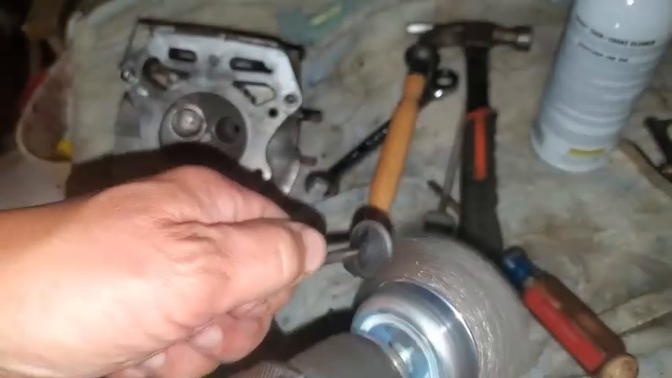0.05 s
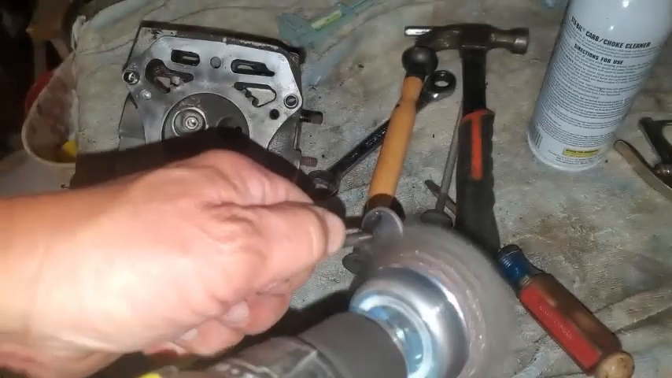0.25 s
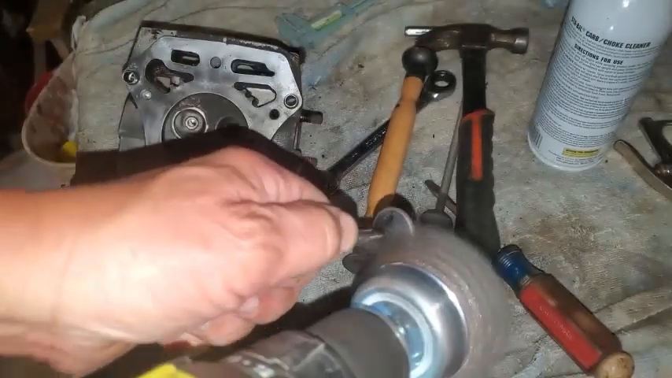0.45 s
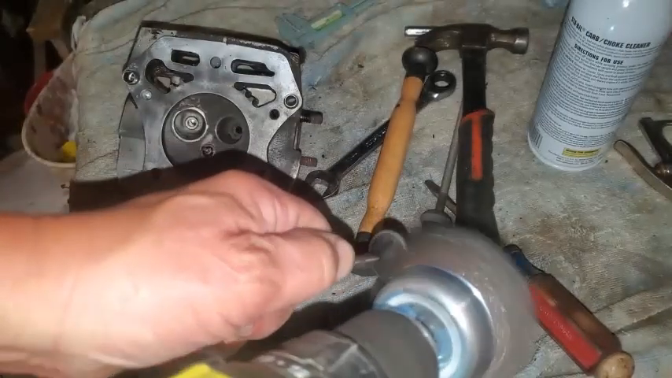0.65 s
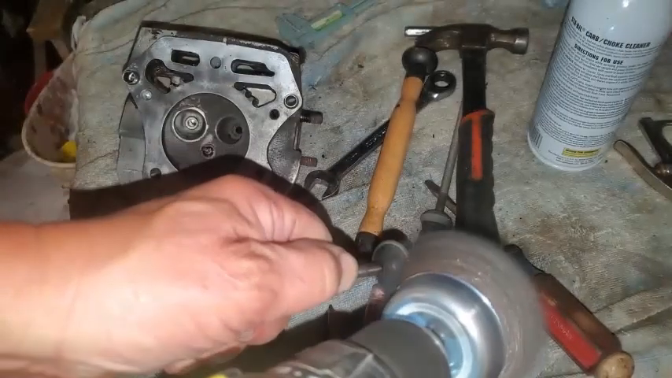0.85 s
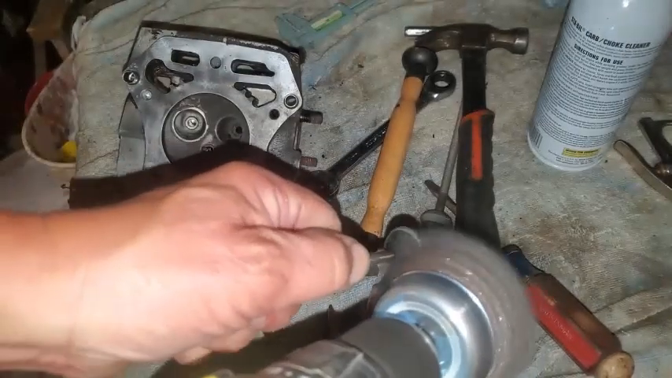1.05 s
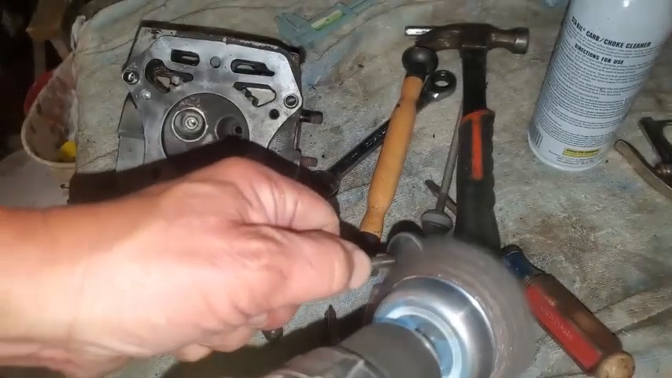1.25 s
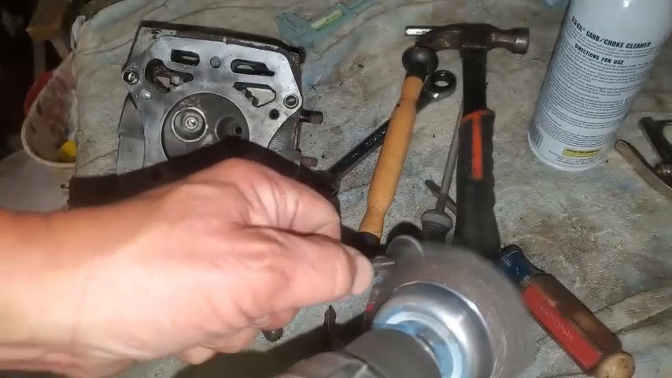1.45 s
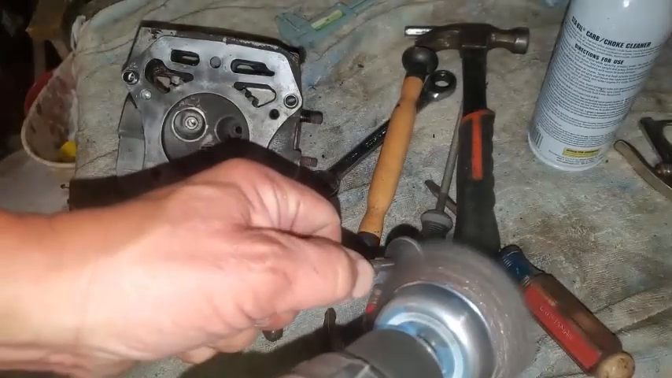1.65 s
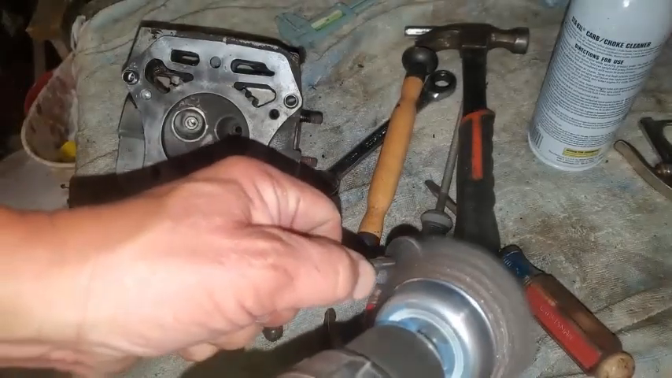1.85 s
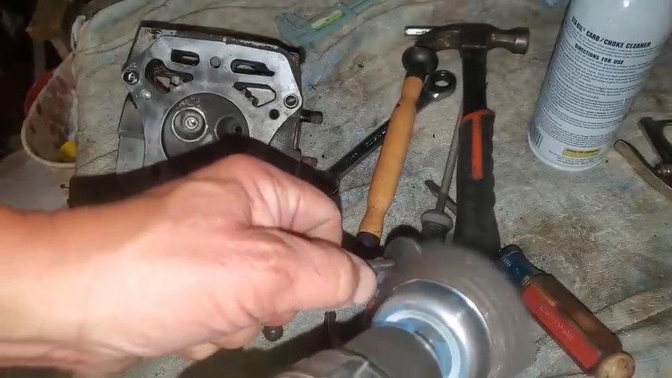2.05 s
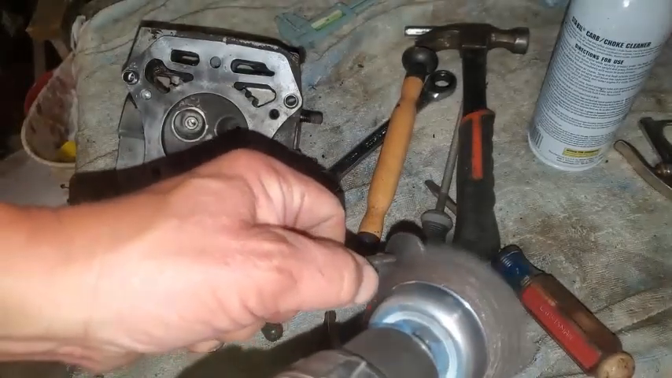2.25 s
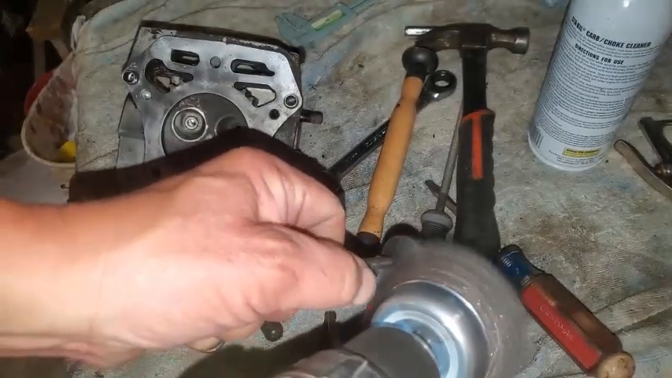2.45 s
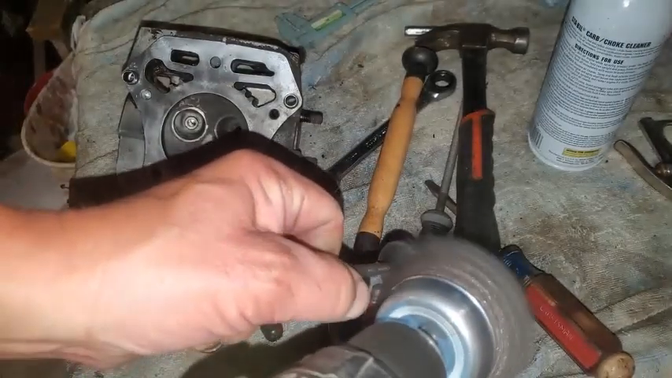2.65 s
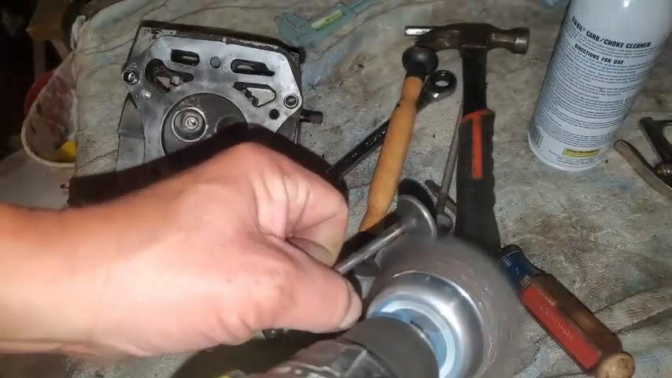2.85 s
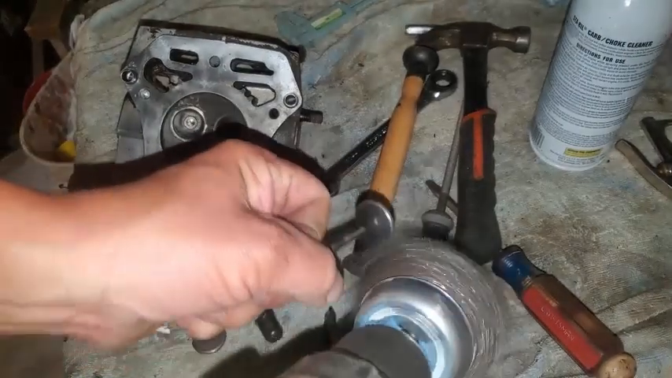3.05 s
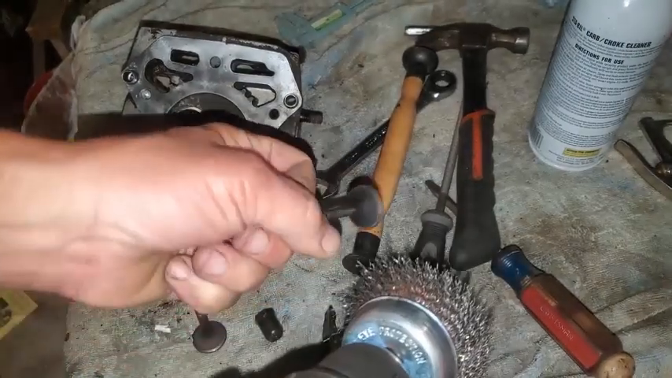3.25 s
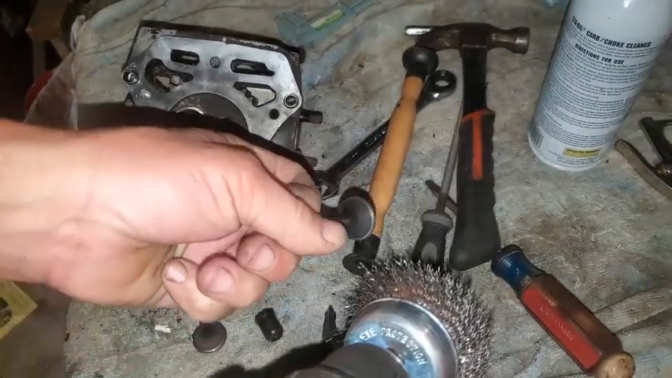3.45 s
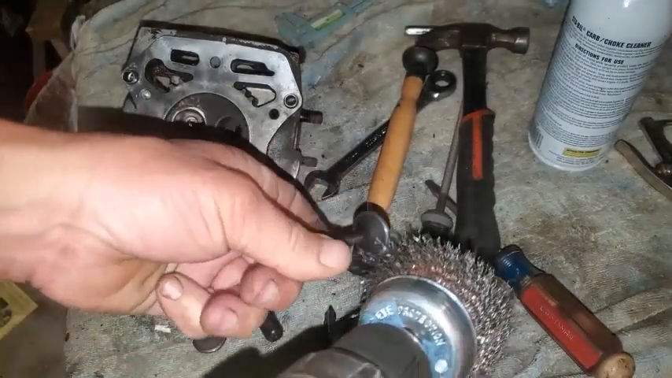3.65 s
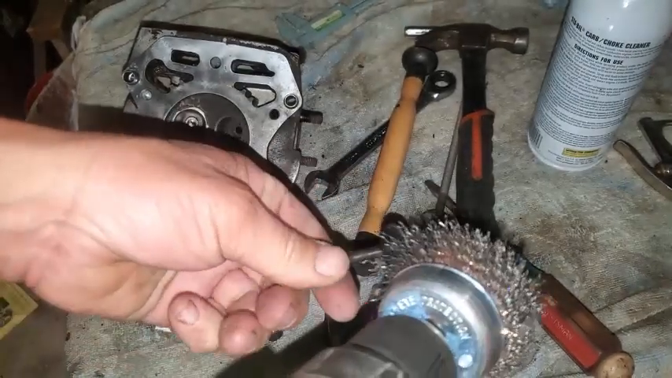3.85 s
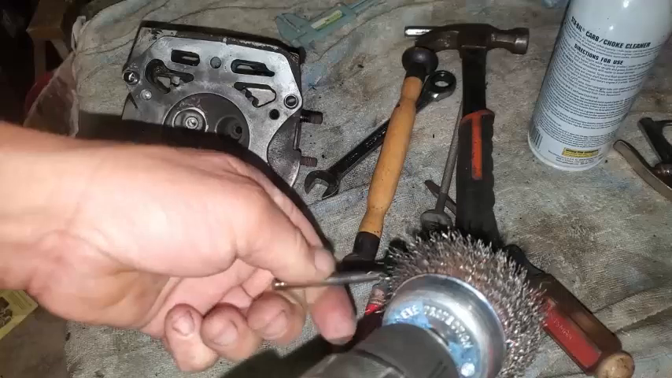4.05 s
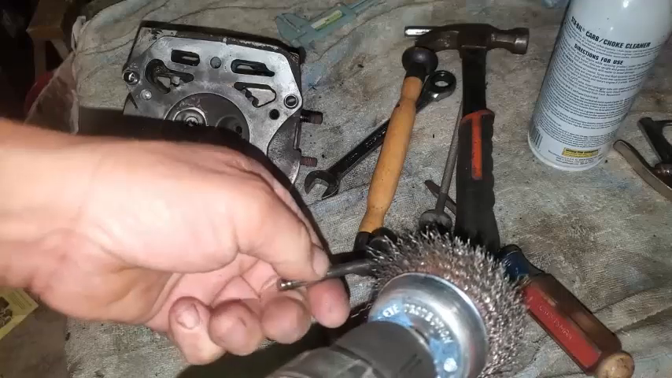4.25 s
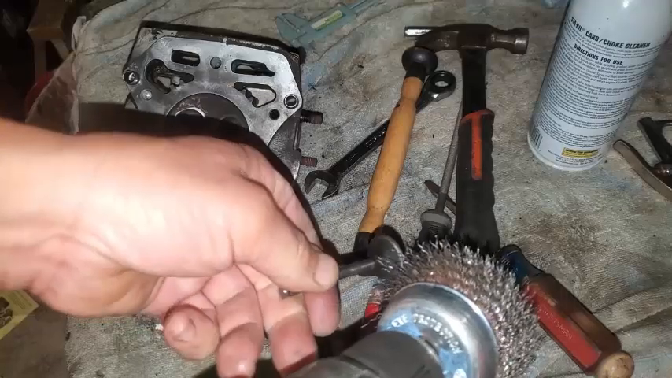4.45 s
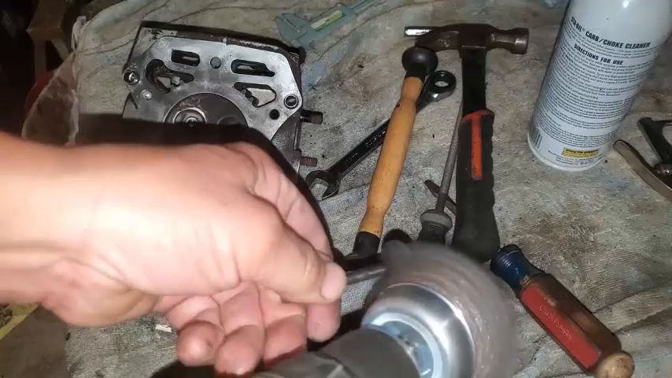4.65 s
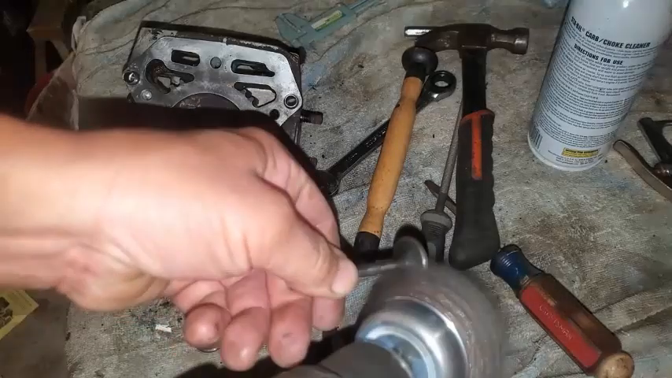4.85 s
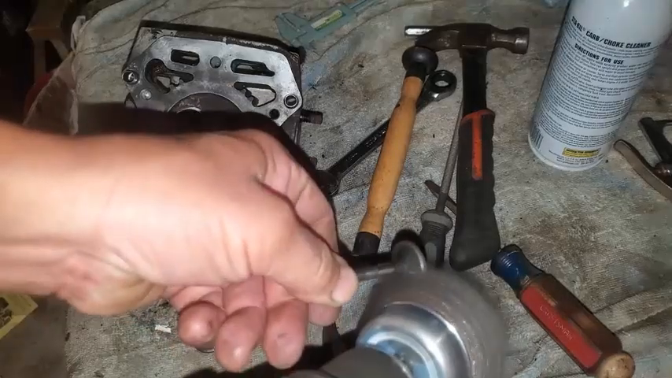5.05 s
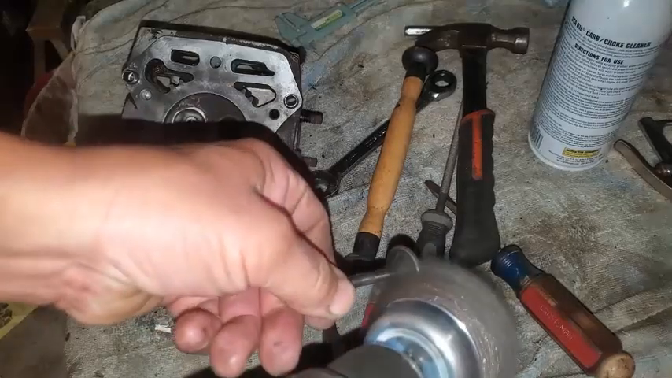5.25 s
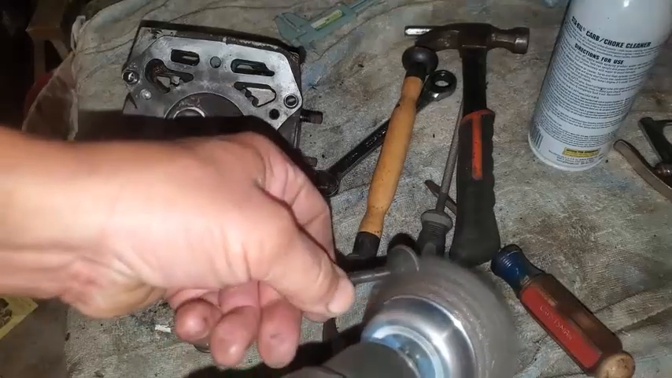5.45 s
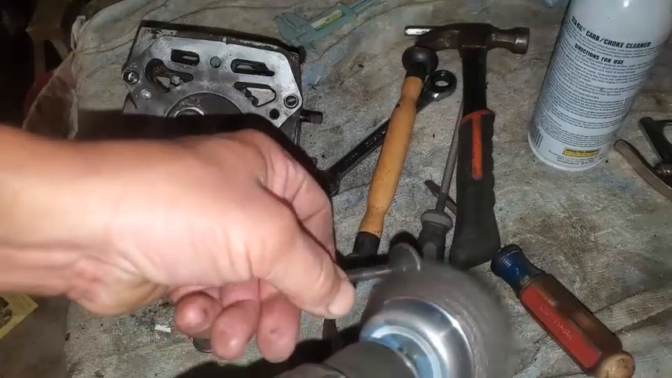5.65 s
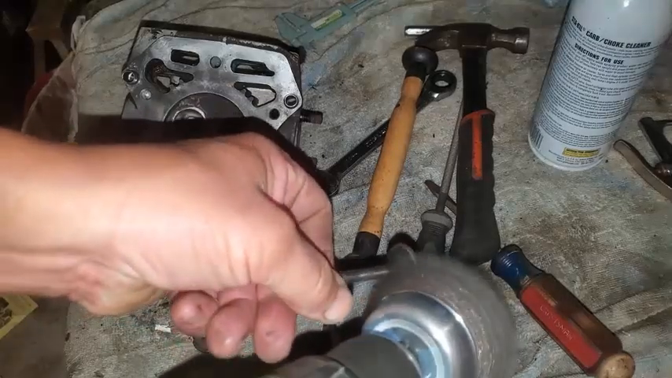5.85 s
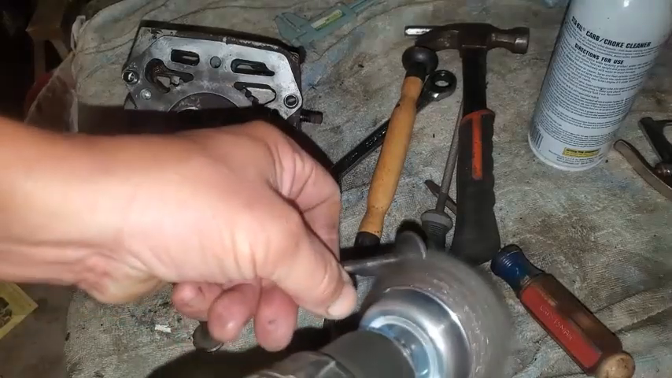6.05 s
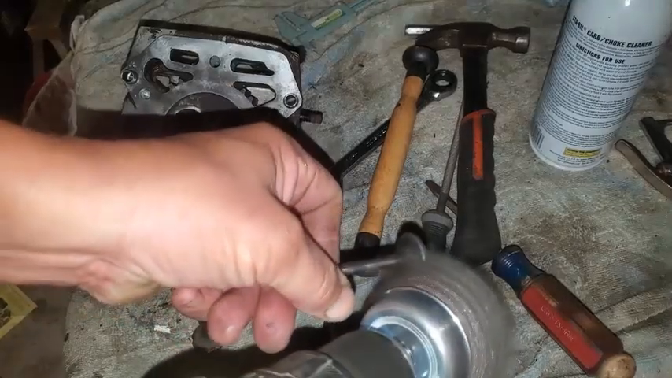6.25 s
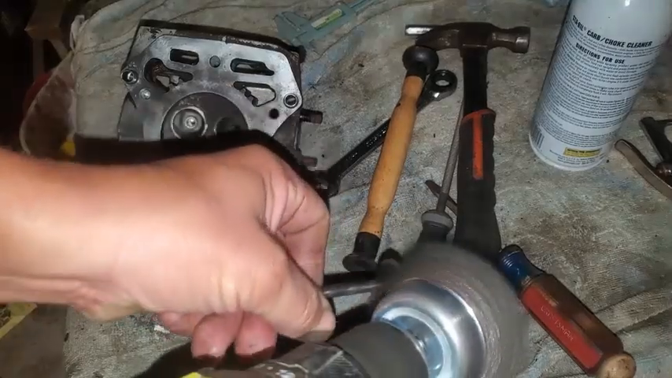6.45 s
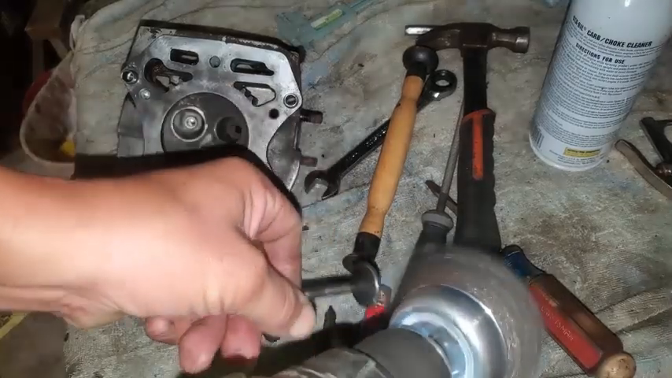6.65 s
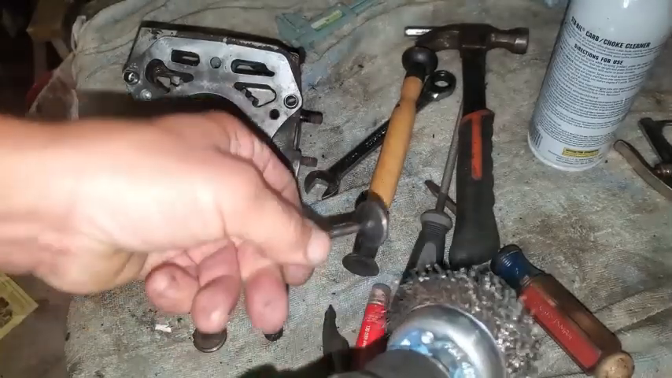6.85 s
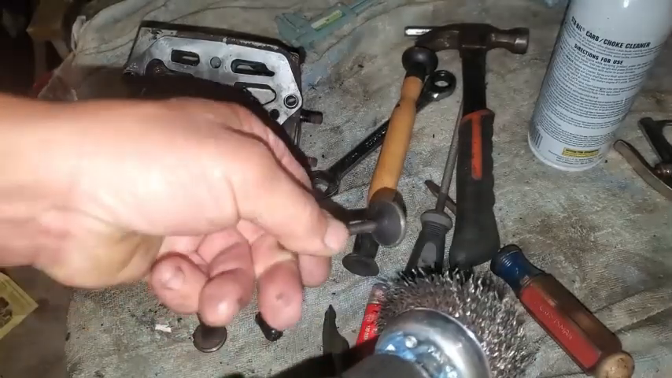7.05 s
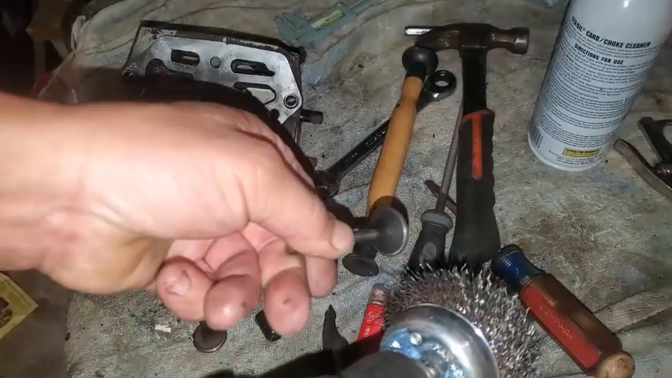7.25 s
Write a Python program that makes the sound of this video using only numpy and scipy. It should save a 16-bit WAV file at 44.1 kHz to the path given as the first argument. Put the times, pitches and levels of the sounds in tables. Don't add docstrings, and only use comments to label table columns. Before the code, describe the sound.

Very close in a small workshop, a cordless drill spins up at once and holds a steady, gritty whine with gear rattle and wire bristles scratching steel. After three seconds it brakes sharply with a cluster of clacks. A distant machine hums through a short pause with faint hand rustling, then the trigger clicks and a second, shorter run follows, braking just as abruptly into near quiet.

```python
import sys
import numpy as np
from scipy import signal
from scipy.fft import rfft, irfft
from scipy.io import wavfile
from scipy.ndimage import uniform_filter1d

SR = 44100
rng = np.random.default_rng(int(sys.argv[2]) if len(sys.argv) > 2 else 0)


def gain_from_db(level_db):
    decades = np.asarray(level_db, float) / 20
    return 10 ** decades


def generate_wav(signal):
    frames = np.transpose(np.atleast_2d(signal))
    scaled = np.clip(frames, -1, 1) * 32767
    pcm = np.round(scaled).astype(np.int16)
    wavfile.write(sys.argv[1], SR, pcm)


N = 322371
T = np.arange(N) / SR
GEAR_RATIO = 14.36


def unit(x):
    return x / np.sqrt(np.mean(x ** 2))


def curves(table):
    s, *columns = np.transpose(table)
    return [np.interp(T, s, c) for c in columns]


def ramp(start_s, length_s):
    return np.clip((T - start_s) / length_s, 0, 1)


def walk(rate):
    levels = uniform_filter1d(np.repeat(rng.standard_normal(int(N / SR * rate) + 2), 4), 4)
    return 1.3 * np.interp(T * rate * 4, np.arange(len(levels)), levels)


def colour(x, points, size=4096):
    hz, db = np.transpose(points)
    log_hz = np.log(np.fft.rfftfreq(size, 1 / SR) + 1)
    cep = irfft(np.log(gain_from_db(np.interp(log_hz, np.log(hz), db))))
    cep[1:size // 2] *= 2
    cep[size // 2 + 1:] = 0
    return signal.fftconvolve(x, irfft(np.exp(rfft(cep))))[:len(x)]


def band(x, hz, width_hz):
    edges = np.clip([hz - width_hz / 2, hz + width_hz / 2], 50, 20000)
    return signal.sosfilt(signal.butter(2, edges, "bandpass", fs=SR, output="sos"), x)


def grains(share, spread_db):
    hit = rng.random(N) < share
    sign = rng.standard_normal(N)
    size = rng.exponential(size=N)
    return unit(hit * sign * gain_from_db(spread_db * size))


def shop():
    # pitch_hz [Hz], level_db [dB per Hz]
    rumble_spectrum = [(15, -47.5), (25, -18.5), (75, -5.5), (145, -5.5), (207, -20), (319, -21.5),
                       (381, -24.5), (635, -39), (1950, -49.5), (4870, -42), (6900, -44.5), (7400, -68),
                       (22000, -120)]
    # time_s [s], level_db [dB]
    swell = [
        (3.25, -62.5),
        (3.8, -67),
        (4.15, -67.5),
        (4.3, -64.5),
        (4.56, -60),
        (6.95, -68.5),
    ]
    # multiple [of its beat], level_db [dB], drift_db [dB per s]
    hum_tones = [(2, -72, 0), (3, -72, -3), (3.72, -66, 0), (5, -70, 4), (6, -67, 2), (7, -76, 0),
                 (8, -66, -6), (9, -82, 0), (10, -80, 0), (11, -82, -3), (15, -77, -2)]
    beat_hz = 24.8
    swell_db = curves(swell)[0]
    mid, side = (unit(colour(rng.standard_normal(N), rumble_spectrum)) for _ in range(2))
    hum = 0
    for k, db, drift_db in hum_tones:
        level_db = db + 70.5 + drift_db * np.clip(T - 3.9, -1, .7) + 2 * walk(6)
        hum = hum + gain_from_db(level_db) * np.sin(2 * np.pi * k * beat_hz * T + .4 * walk(4))
    return gain_from_db(swell_db - 3.0) * (mid + 0.57 * hum + 0.42 * side * np.array([[1], [-1]]))


def rustle():
    # start_s [s], level_db [dB], centre_hz [Hz], width_hz [Hz],
    # decay_s [s]
    puffs = [(3.3, -86, 4500, 1500, .34), (3.67, -67, 6400, 1200, .04), (3.68, -87, 2600, 900, .05),
             (3.905, -77, 3000, 5000, .04), (4.14, -80, 5300, 1500, .04), (4.47, -78, 3500, 5500, .1),
             (4.537, -52, 1100, 1200, .003), (4.51, -75, 2500, 4000, .06), (3.36, -88, 900, 80, .2),
             (3.28, -87, 1800, 300, .09), (7.0, -89, 5000, 3000, .27), (7.265, -70, 6400, 1200, .08),
             (7.27, -84, 3000, 1200, .05)]
    out, t = np.zeros(N + SR), T[:SR]
    for s, db, hz, width_hz, decay in puffs:
        puff = np.minimum(t * 500, 1) * np.exp(-t / decay) * unit(band(rng.standard_normal(SR), hz, width_hz))
        out[int(s * SR):int(s * SR) + SR] += gain_from_db(db) * puff
    return out[:N] * gain_from_db(2.5 * walk(67))


def motor():
    # [dB, brush at low speed]
    runs = [
        (-.015, 2.985, 3.02, 3.108, 6),
        (4.593, 6.675, 6.729, 6.815, 4),
    ]
    full_hz, spin_up_s, start_lag_s = 379.2, .09, .005
    coast_hz_per_s, brake_hz_per_s = 1050, 2100
    which = np.where(T < (runs[0][3] + runs[1][0]) / 2, 0, 1)
    on, free, brake, stop, bite_db = np.array(runs).T[:, which]
    up = np.tanh(np.maximum(T - on - start_lag_s, 0) / spin_up_s)
    lost_hz = coast_hz_per_s * np.clip(T - free, 0, brake - free) + brake_hz_per_s * np.maximum(T - brake, 0)
    rotor_hz = np.maximum(full_hz * up * (1 + .004 * walk(2.5)) - lost_hz, 0)
    slow = 1 - rotor_hz / full_hz
    level_db = -25.5 - 11.5 * slow + bite_db * (1 - up)
    level_db = level_db + 2.5 * np.exp(-np.abs(T - on) / 0.36)
    level_db = level_db - 2 * ramp(free, brake - free)
    level_db = level_db + (-6.5 + bite_db) * ramp(brake - .011, .004) + .5 * walk(5)
    spinning = ramp(on, 0.0027) * (1 - ramp(stop - .0048, 0.0075))
    wire_db = -13.5 - 6.5 * slow + 1.0 * walk(9.9)
    return rotor_hz, spinning, level_db, wire_db


def draught(turns):
    # pitch_hz [Hz], level_db [dB per Hz]
    buffet_spectrum = [(20, -12), (50, -4), (100, 2.5), (170, -4), (300, -14.5), (800, -38)]
    # time_s [s], length_s [s], level_db [dB]
    jolts = [
        (.06, 0.053, 11.5),
        (0.212, 0.067, 13.5),
        (1.552, 0.14, 4),
        (2.898, .1, 5),
        (4.76, .09, 5.5),
        (6.617, 0.083, 9),
    ]
    chuck = 2 * np.pi * turns / GEAR_RATIO
    beat_db = 5 * np.sin(2 * chuck) + 2.1 * np.sin(chuck) + 3 * walk(4.01)
    beat_db = beat_db + sum(db * np.exp(-((T - s) / length) ** 2) for s, length, db in jolts)
    shared = .7 * gain_from_db(3.6 * walk(7)) * unit(colour(rng.standard_normal(N), buffet_spectrum))
    both = []
    for _ in range(2):
        own = gain_from_db(4.0 * walk(6.5)) * unit(colour(rng.standard_normal(N), buffet_spectrum))
        both.append(gain_from_db(-32.0 + beat_db) * (shared + own))
    return np.array(both)


def clacks():
    # start_s [s], peak_db [dB], ring_hz [Hz], length_ms [ms]
    knock_list = [(3.0283, -12, 4300, 1.4), (3.0318, -13, 5000, 1.5), (3.0328, -9.5, 2000, 2.2),
                  (3.072, -16.5, 1700, 3), (3.0995, -16, 5000, 2.2), (3.1036, -14, 4000, 1.5),
                  (3.1206, -25, 4350, 3), (4.5955, -9.5, 2300, .9), (4.6272, -14.5, 2450, 1.8),
                  (4.636, -16, 2500, 5), (4.669, -13, 4000, 1.8), (4.675, -14, 4000, 1.8),
                  (6.7160, -12, 3000, 1.4), (6.7298, -9.5, 3700, 1.6), (6.7304, -14, 6200, 1.4),
                  (6.785, -17.5, 1500, 5), (6.7945, -23, 1500, 2), (6.8104, -23, 2200, 3)]
    out, t = np.zeros(N), T[:2000]
    noise = rng.standard_normal((len(knock_list), len(t)))
    for (s, db, hz, ms), grit in zip(knock_list, noise):
        crack = unit(band(grit, 300 + 1.2 * hz, 2.4 * hz))
        knock = (crack + .5 * np.sin(2 * np.pi * hz * t)) * np.exp(-1000 * t / ms)
        i = int(s * SR)
        out[i:i + len(t)] += gain_from_db(db + 1.0) * knock / np.abs(knock).max()
    return out


def rattle(turns):
    # pitch_hz [Hz], level_db [dB per Hz]
    rattle_spectrum = [(25, -38), (90, -23.5), (250, -21.5), (420, -12), (1000, -8), (1750, -1.5),
                       (2050, -2.5), (3000, -5.5), (4500, -3), (5200, -5.5), (6700, -5.5), (7150, -10.5),
                       (7350, -19.5), (9000, -40)]
    chuck = 2 * np.pi * turns / GEAR_RATIO
    throb_db = 0.19 * np.sin(chuck) + 0.15 * np.sin(2 * chuck + 0.36) + 1.17 * walk(90) + 0.18 * walk(8)
    return gain_from_db(throb_db) * unit(colour(grains(.4, 1.5), rattle_spectrum))


def casing_db(hz):
    # pitch_hz [Hz], width_hz [Hz], lift_db [dB]
    shell_modes = [(950, 350, 9), (1300, 400, -6), (2400, 550, 6), (3350, 400, -7), (4700, 1800, -2)]
    return sum(db / (1 + (2 * (hz - f) / w) ** 2) for f, w, db in shell_modes)


def whine(rotor_hz, turns):
    rotor_tones = [(1, -23.5, 2.5, -3, -3, 1), (1.14, -27, 2.5, -6, -6, 1), (1.21, -28, 2.5, -6, -6, 1),
                   (2, -27, 2.5, -3, -3, 1), (3.75, -34, 2, 11, 11, 680), (8, -8.5, 2.5, -8, -9, 1900),
                   (9, -24, 4, -3, -12, 1), (16, -26, 2.5, 11, 3, 2200), (20, -25, 3, 0, -10, 1),
                   (24, -26, 3, 0, -10, 1)]
    torque = uniform_filter1d(np.gradient(rotor_hz) * SR, size=800) / 1500
    push = np.clip(torque, 0, 1)
    brake = np.clip(-torque - .5, 0, 1)
    coast = np.clip(-torque, 0, 1) - brake
    judder_db = 2 * (push + brake) * walk(70)
    fan_db = -9 + 2 * push + judder_db + 2 * walk(14) + 1.5 * np.sin(2 * np.pi * turns / GEAR_RATIO)
    fan = np.sin(2 * np.pi * 19 * turns + .5 * walk(40))
    out = gain_from_db(fan_db) * (rotor_hz / 380) ** 3 * fan
    for k, db, shake_db, push_db, brake_db, above_hz in rotor_tones:
        tone = np.sin(2 * np.pi * k * turns + .35 * walk(40))
        tone = tone * np.clip(k * rotor_hz / above_hz, 0, 1) ** 8
        tone_db = db + push_db * push + brake_db * brake + casing_db(k * rotor_hz)
        out = out + gain_from_db(tone_db - 7.8 * coast + judder_db + shake_db * walk(35)) * tone
    return out * np.clip(rotor_hz / (130 + 110 * brake), 0, 1) ** 4


def flares(turns):
    sweeps = [(.029, .009, 16, 1), (.048, .005, 16, -3), (.055, .005, 19, -1), (.065, .007, 15.5, -3),
              (.075, .015, 7.7, -2), (.08, .01, 19, -5), (.11, .006, 19, -2), (.128, .013, 8, -6),
              (3.052, .014, 8, -2), (3.058, .009, 3.75, -3), (3.087, .005, 3.6, -7), (4.638, .004, 16, -2),
              (4.668, .015, 3.75, -4), (4.685, .006, 5.2, -3), (4.702, .016, 8, -2), (4.71, .01, 19, -3),
              (4.765, .013, 19, -5), (4.775, .028, 8, -7), (6.748, .012, 8, -6), (6.767, .014, 3.75, -4)]
    shake = walk(150)
    out = 0
    for s, half, k, db in sweeps:
        tone = np.sin(2 * np.pi * k * turns + .5 * shake[::-1])
        out = out + gain_from_db(db) * np.exp(-((T - s) / half) ** 4) * tone
    return gain_from_db(2.5 * shake) * out


def wires(turns):
    # pitch_hz [Hz], level_db [dB per Hz]
    wire_spectrum = [(3000, -28.5), (7300, 7.5), (8150, 10.5), (8400, 13), (10600, 14.5), (12500, -28.5)]
    wobble_db = 0.4 * np.sin(2 * np.pi * turns / GEAR_RATIO + 1.0) + 0.23 * walk(45) + 0.18 * walk(9.9)
    return gain_from_db(wobble_db) * unit(colour(grains(.3, 0.7), wire_spectrum))


def room(x, count=6):
    t60_s = 0.28
    t = T[:SR // 2]
    noise = rng.standard_normal((count, 2, len(t)))
    dull = signal.lfilter([.3], [1, -.7], noise)
    deep = signal.lfilter([.15], [1, -.85], noise)
    tail = (noise - dull) * gain_from_db(-60 * t / (0.75 * t60_s))
    tail = tail + (dull - deep) * gain_from_db(-60 * t / (1.0 * t60_s))
    tail = tail + deep * gain_from_db(-60 * t / (0.7 * t60_s))
    tail = tail * np.minimum(t / 0.0016, 1)
    aim = np.array([walk(1.5) for _ in range(count)])
    aim = aim / np.sqrt(np.sum(aim ** 2, axis=0))
    tail = tail / np.sqrt(np.mean(np.sum(tail ** 2, axis=2)))
    return gain_from_db(-3.5) * sum(signal.fftconvolve((x * a)[None], h, axes=1)[:, :N] for a, h in zip(aim, tail))


def ports(x, count, left_db):
    return np.array([x * gain_from_db(left_db / 2), np.roll(x, count) * gain_from_db(-left_db / 2)])


def body_colour(near):
    shading = [(0, 1780, 220, .35), (0, 2110, 300, -.5), (1, 1650, 600, -.2), (0, 4400, 700, .12)]
    out = near
    for port, hz, width_hz, share in shading:
        out = out + share * band(near[port], hz, width_hz) * (np.arange(2) == port)[:, None]
    return out


def scene():
    rotor_hz, spinning, level_db, wire_db = motor()
    turns = np.cumsum(rotor_hz) / SR
    on = spinning * gain_from_db(level_db)
    body = on * rattle(turns)
    knocks = clacks()
    song = spinning * gain_from_db(-25) * (whine(rotor_hz, turns) + flares(turns))
    shaded = song - .75 * band(song, 3030, 300)
    brush = on * (gain_from_db(wire_db) * wires(turns) + gain_from_db(-4.5) * rattle(turns))
    rim = on * gain_from_db(wire_db - 3.5) * wires(turns)
    hands = rustle()
    near = ports(body, count=8, left_db=5.5) + ports(brush, count=12, left_db=12.0)
    near = near + ports(hands, count=4, left_db=0.0) + ports(rim, count=0, left_db=8.0)
    near = body_colour(near + ports(knocks, count=1, left_db=4.0))
    echo = room(body + gain_from_db(1.0) * knocks + brush + hands + gain_from_db(-3.5) * song)
    return near + on * draught(turns) + echo + shop() + np.array([shaded, np.roll(song, shift=1)])


def masking(x, left_db=-50, loud_db=-96):
    starved = [(130, 215, .4, .4), (215, 300, .5, .45), (1100, 1250, .1, .1), (3900, 4100, .06, .05),
               (5400, 5700, .03, .03), (470, 560, .15, .15), (560, 690, .22, .2), (690, 860, .12, .12),
               (860, 1030, .36, .25), (1030, 1100, .15, .15), (1250, 1400, .08, .08),
               (1950, 2070, .35, .08), (2070, 2330, .62, .1), (2330, 2500, .25, .05), (2500, 2600, .3, .05),
               (2600, 2780, .46, .08), (2780, 2980, .5, .08), (3080, 3200, .25, .05),
               (3200, 3350, .15, .05), (3450, 3600, .25, .1), (3600, 3780, .15, .1), (7290, 7500, .85, .1),
               (7500, 7750, .9, .12), (7750, 7950, .93, .2), (7950, 8270, .9, .15), (8270, 8600, .3, .25),
               (8600, 8950, .2, .2), (8950, 9300, .2, .2), (9300, 9650, .2, .2), (9650, 10000, .2, .2),
               (10000, 10400, .2, .2), (10400, 10850, .15, .15)]
    top_bands_hz = 7000
    hz, _, z = signal.stft(np.array([x[0] + x[1], x[0] - x[1]]) / 2, SR, nperseg=2048, noverlap=1024)
    level = np.abs(z).mean(axis=(0, 1))
    loud = level > gain_from_db(loud_db)
    steady = (level > gain_from_db(loud_db + 24)) & np.roll(loud, shift=9) & np.roll(loud, shift=-7)
    luck = uniform_filter1d(rng.standard_normal((len(starved), 2, len(loud))), size=3)
    luck[:, 1] += .8 * luck[:, 0]
    for (low, high, *shares), draw in zip(starved, luck):
        limit = np.array([np.quantile(d, s) for d, s in zip(draw, shares)])
        lost = (loud if low > top_bands_hz else steady) & (draw < limit[:, None])
        z[:, (hz >= low) & (hz < high)] *= np.where(lost, gain_from_db(left_db), 1)[:, None]
    z[:, hz > top_bands_hz + 600] *= np.where(loud, 1, gain_from_db(left_db))
    mid, side = signal.istft(z, nperseg=2048, noverlap=1024)[1][:, :N]
    return np.array([mid + side, mid - side])


def top_cut(x):
    return signal.sosfilt(signal.butter(12, 11920, fs=SR, output="sos"), x)


def record(dry):
    # start_s [s], length_s [s], level_db [dB]
    ducks = [
        (3.038, .006, -5),
        (3.109, .010, -7),
        (6.7195, .0095, -9),
        (6.7355, .004, -9),
        (3.024, .004, -4),
    ]
    duck_db = sum(db * (ramp(s, .001) - ramp(s + length - .001, .001)) for s, length, db in ducks)
    thinned = masking(dry * gain_from_db(duck_db))
    cut = signal.sosfilt(signal.ellip(12, .3, 70, 10830, fs=SR, output="sos"), thinned)
    return top_cut(cut)


dry = scene()
out = record(dry)
generate_wav(out)
```